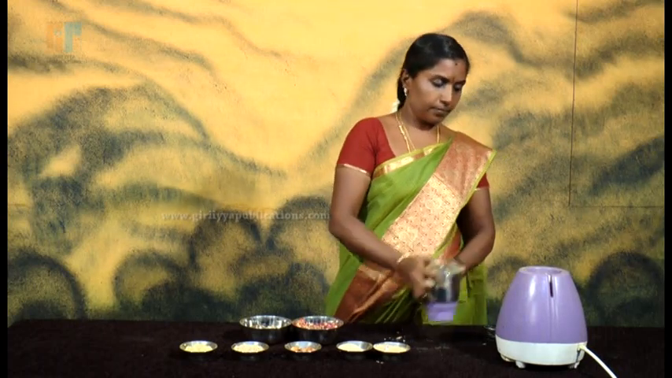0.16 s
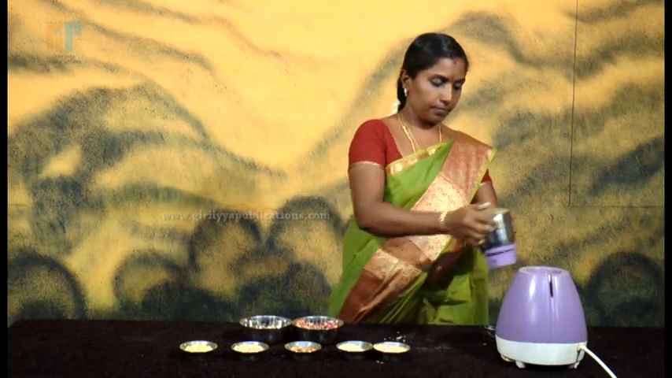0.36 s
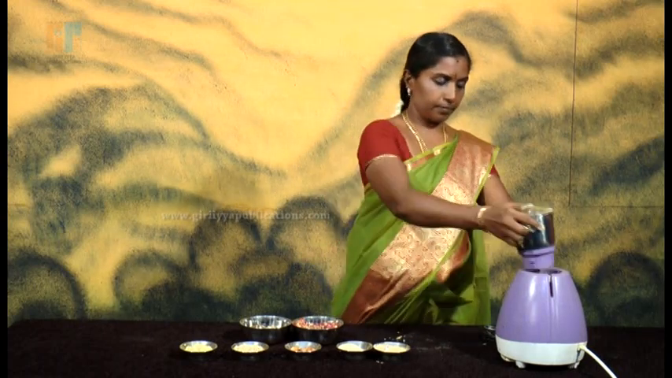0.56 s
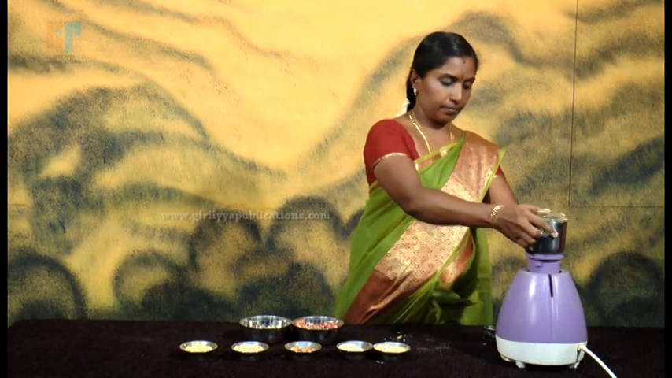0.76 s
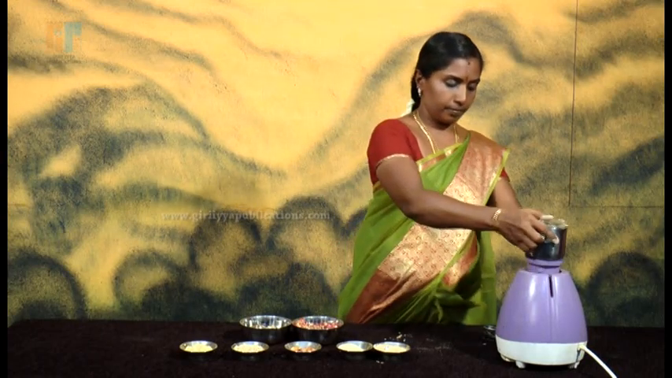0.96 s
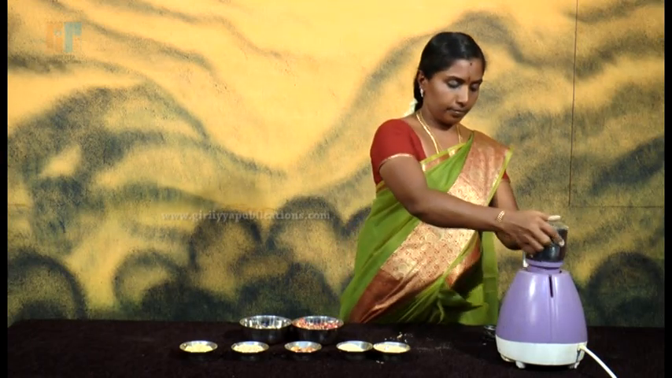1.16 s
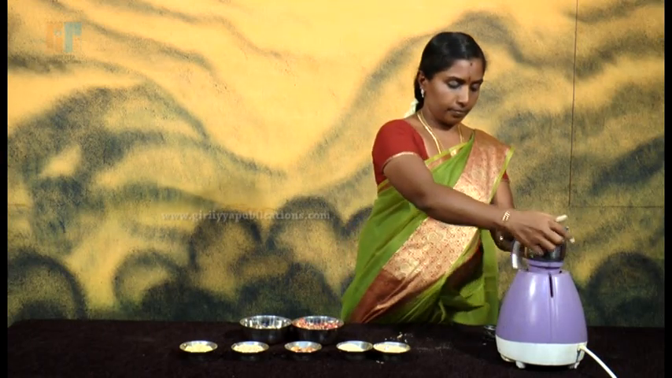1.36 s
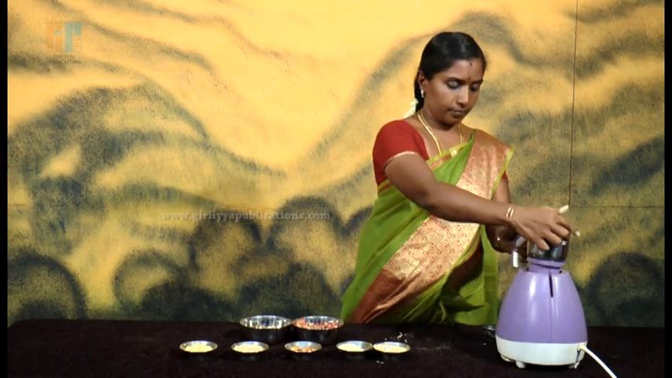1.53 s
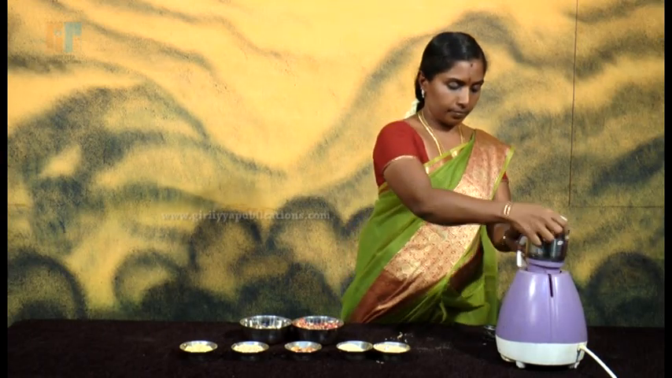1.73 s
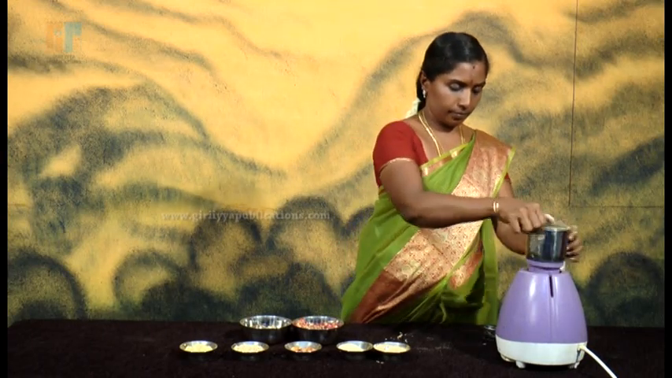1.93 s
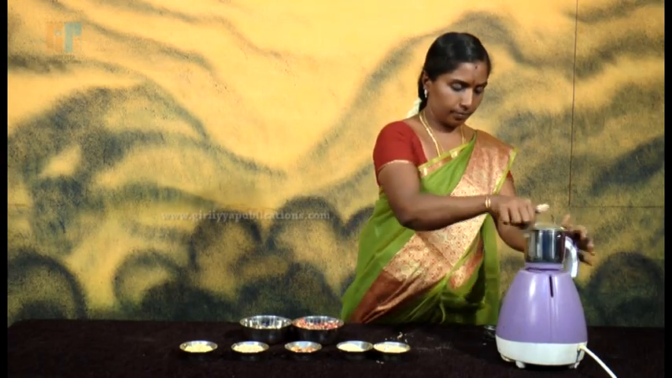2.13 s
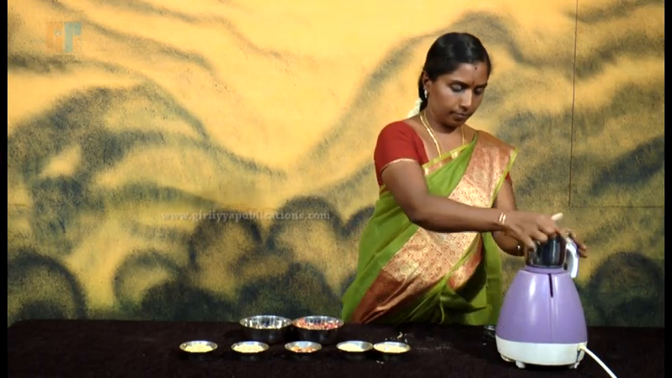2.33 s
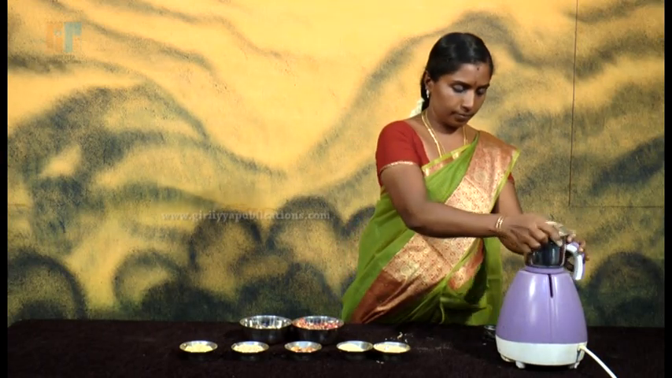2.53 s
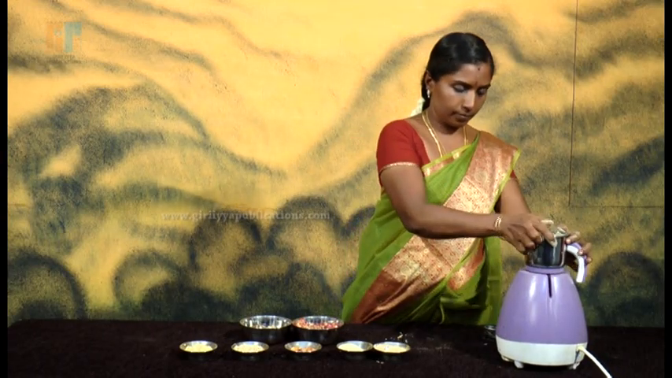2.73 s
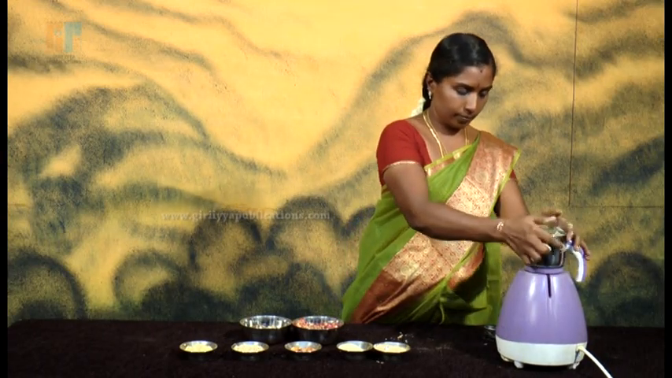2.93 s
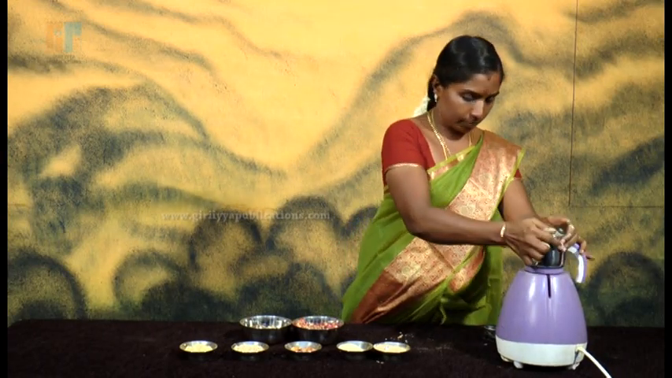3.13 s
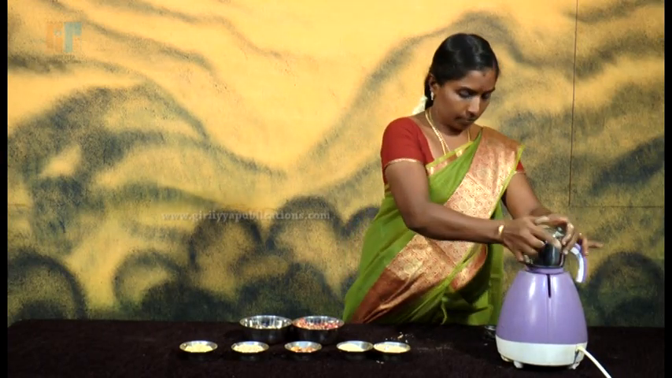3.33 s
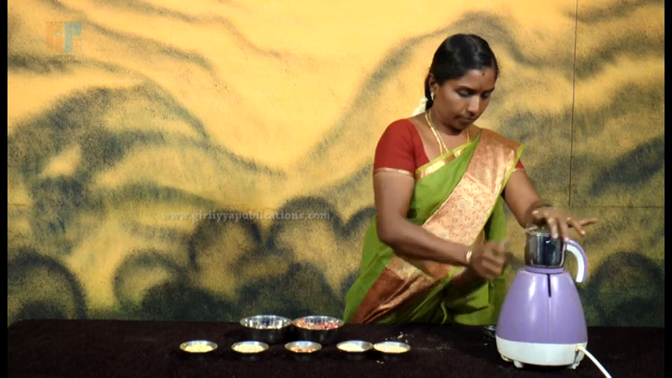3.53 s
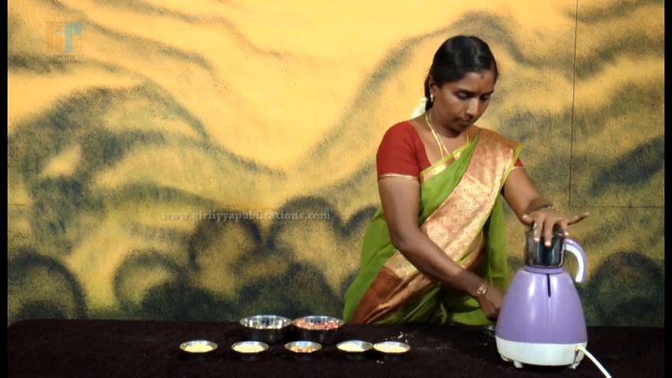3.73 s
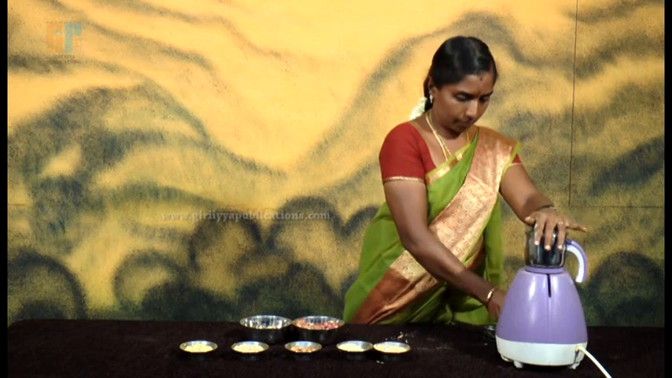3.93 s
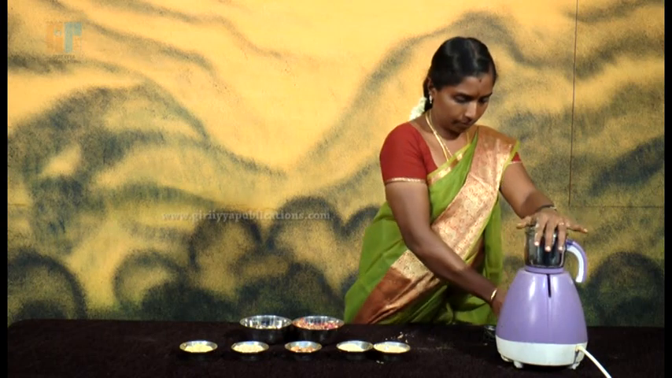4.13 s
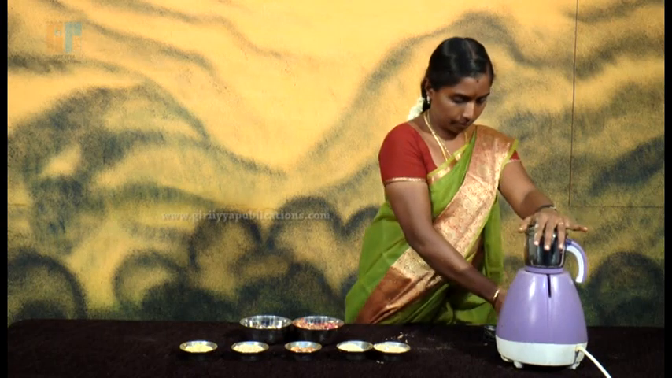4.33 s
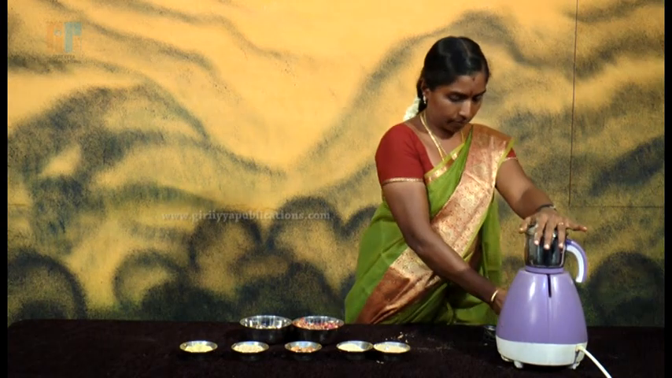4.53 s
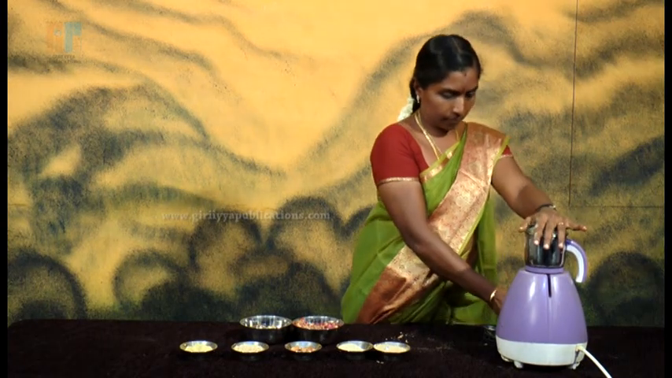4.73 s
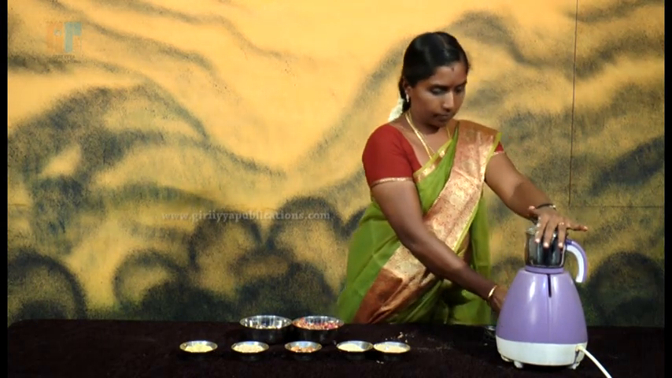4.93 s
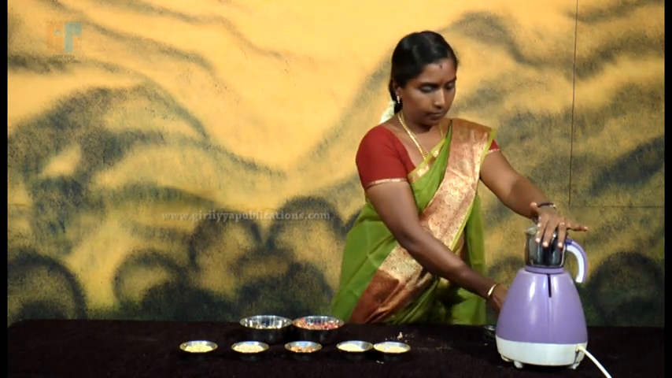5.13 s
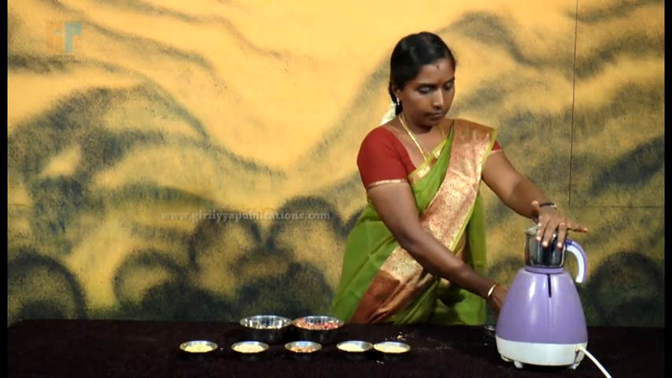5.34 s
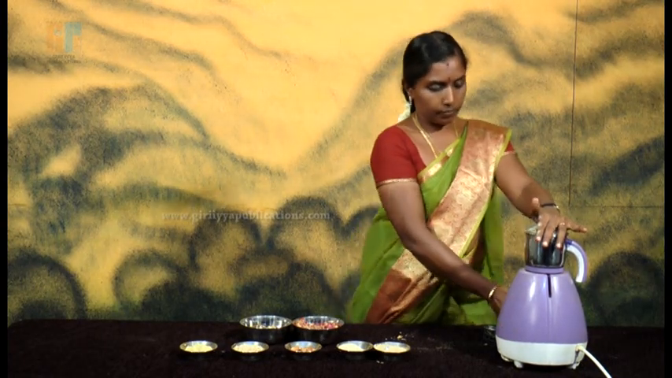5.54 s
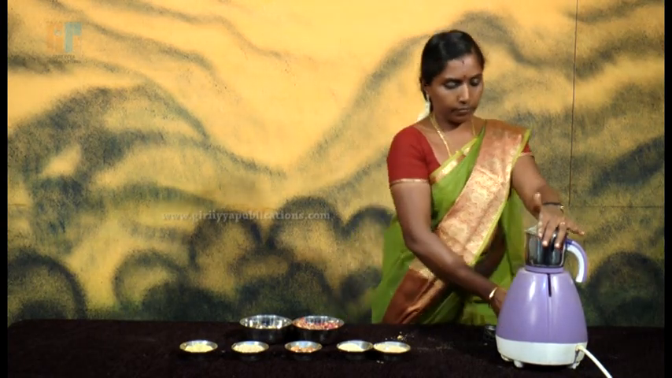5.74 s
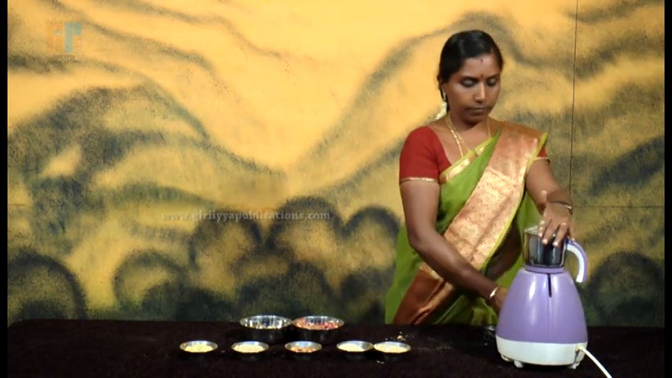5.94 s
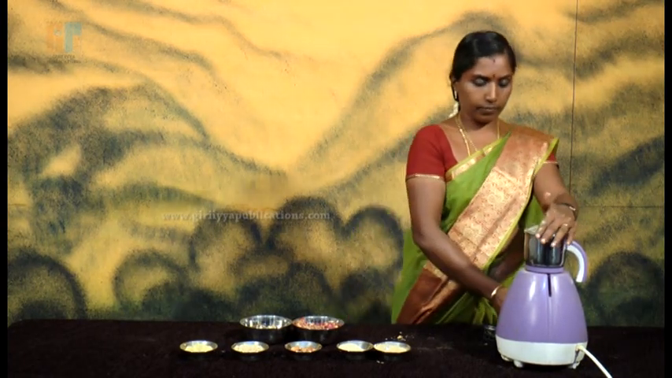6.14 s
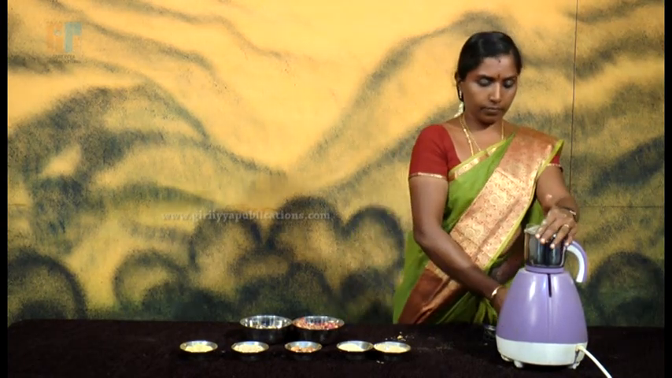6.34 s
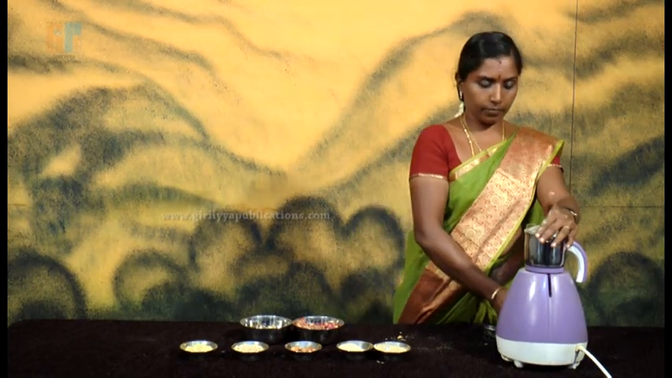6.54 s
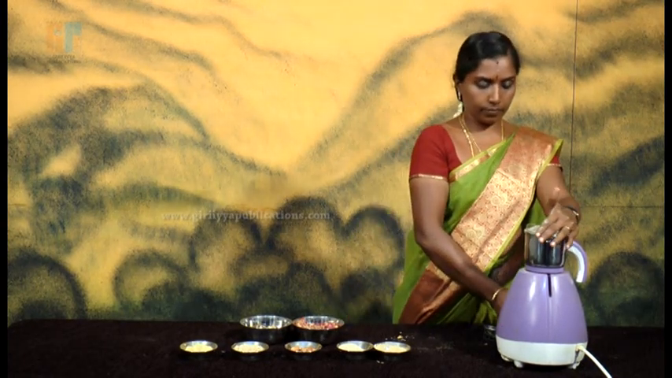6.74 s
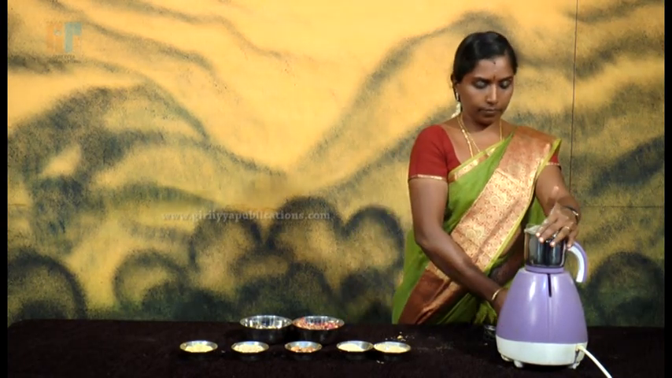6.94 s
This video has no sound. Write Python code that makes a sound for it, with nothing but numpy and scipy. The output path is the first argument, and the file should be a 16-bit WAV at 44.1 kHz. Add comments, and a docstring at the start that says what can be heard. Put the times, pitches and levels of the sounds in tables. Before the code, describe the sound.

At about 0.6 seconds a steel jar is set onto a mixer grinder with a cluster of knocks, loudest up to 1.1 seconds, each making the wooden table boom. Hands rub and twist the jar, with more clacks around 2 seconds and lighter bumps until 3.7. Glass bangles clink faintly, most clearly near 3.8 seconds. After a short lull, a switch snaps on at about 4.4 seconds. The motor hums and whines upward, briefly shaking the table, and reaches full speed around 5.5 seconds. Hard spices roar and crack against the jar wall, most sharply in the first second of grinding. From about 5.2 seconds the roar softens as they turn to powder, though lumps keep rattling. The motor is still running steadily at the end, around 7 seconds. The sound is in stereo, with the short echo of a small room.

```python
"""In a small room, a steel jar is seated and twisted onto a mixer grinder on a wooden table.
Hands rub, each knock makes the table boom, and glass bangles clink. Then a switch clicks: the motor
climbs to full speed, whines, and whirls hard spices against the jar wall. Their roar softens as they
turn to powder. Two microphones hear it all and round off the loudest peaks."""
import sys
import numpy as np
from scipy import signal
from scipy.fft import rfft, irfft, next_fast_len
from scipy.io import wavfile
from scipy.ndimage import uniform_filter1d

SR = 44100
rng = np.random.default_rng(int(sys.argv[2]) if len(sys.argv) > 2 else 0)


def master(y):
    """Save y as 16-bit WAV."""
    cut = np.clip(np.atleast_2d(y).T, -1, 1)
    pcm = np.round(cut * 32767)  # scale
    wavfile.write(sys.argv[1], SR, pcm.astype(np.int16))


N = 312669
FFT_SIZE, TIME = next_fast_len(N), np.arange(N) / SR
SWITCH_S = 4.376  # the motor starts


def undb(db):
    """Turn decibels into a gain to multiply by."""
    return 10 ** (np.asarray(db) / 20)


def unit(x):
    """Scale a sound to an average power of 1."""
    return x / np.sqrt(np.mean(x ** 2))


def curves(table):
    """Join a table's rows with straight lines over time."""
    times, *columns = np.transpose(table)
    return [np.interp(TIME, times, column) for column in columns]


def along(points):
    """Spread (frequency, value) points over the whole spectrum."""
    hz, value = np.transpose(points)
    return np.interp(np.log(np.fft.rfftfreq(FFT_SIZE, 1 / SR) + 1), np.log(hz), value)


def colour(x, points):
    """Shape a sound's bass and treble with (frequency, level) points."""
    return unit(irfft(rfft(x, FFT_SIZE) * undb(along(points)), FFT_SIZE)[..., :N])


def band(lo_hz, hi_hz):
    """Noise between two frequencies."""
    bandpass = signal.butter(2, [lo_hz, hi_hz], "bandpass", fs=SR, output="sos")
    return unit(signal.sosfilt(bandpass, rng.standard_normal(N)))


def wide_noise():
    """Noise that is half shared, half different in left and right."""
    return rng.standard_normal(N) + rng.standard_normal((2, N))


def wobble(rate):
    """A smooth random drift of size about 1, with `rate` new values a second."""
    hold = int(SR / rate)
    steps = np.repeat(rng.standard_normal(N // hold + 1), hold)
    return 1.113 * uniform_filter1d(uniform_filter1d(steps, hold), hold)[:N]


def bursts(times, db, t60, rise_s):
    """A loudness curve that jumps up at each time, then fades 60 dB in t60 seconds."""
    blows = np.zeros(N)
    blows[(times * SR).astype(int)] = undb(db)
    rise, fall = np.exp(-1 / (rise_s * SR)), np.exp(-np.log(1000) / (t60 * SR))
    return signal.lfilter([1 - rise], np.convolve([1, -rise], [1, -fall]), blows)


def ring(x, hz, t60):
    """One natural note of an object, set ringing by x; it fades 60 dB in t60 seconds."""
    fall, angle = np.exp(-np.log(1000) / (t60 * SR)), 2 * np.pi * hz / SR
    return signal.lfilter([0, np.sin(angle)], [1, -2 * fall * np.cos(angle), fall * fall], x)


def strike(times, db, notes, scatter_db, spread_s, favour_hz=None, slope_db=0):
    """Each blow rings each note a bit differently; notes lose slope_db per octave from favour_hz."""
    chance, out = rng.standard_normal((len(times), 5, len(notes))), 0
    for (hz, note_db, t60), (delay, sign, strength, phase, pan) in zip(notes, chance.T):
        blows, at = np.zeros((2, N)), (times + spread_s * np.abs(delay)) * SR
        size_db = db + note_db + scatter_db * strength
        if favour_hz is not None:
            size_db -= slope_db * np.abs(np.log2(hz / favour_hz))
        for mic, side in enumerate((1, -1)):  # left and right differ in timing and strength
            lag = side * .4 * phase * SR / (2 * np.pi * hz)
            gain = undb(size_db + side * 3 * pan)
            np.add.at(blows[mic], (at + lag).astype(int), np.sign(sign) * gain)
        out = out + ring(blows, hz, t60)
    return out


# The tone of the room's echo: f/Hz, level/dB
ECHO_TONE = [(60, -9), (300, -13), (1000, -12), (2500, -8), (6000, -7.5)]
# How much louder the left microphone is than the right: f/Hz, level/dB
LEFT_LOUDER = [(60, -5.5), (110, -11), (200, 8.5), (380, 1), (900, 6.5), (4400, 1), (8100, 8.5), (14000, 0)]
# How far the left one's wave runs ahead: f/Hz, phase/rad
LEFT_AHEAD = [(60, .6), (300, .8), (800, .7), (1100, .1), (4300, 0), (5300, .6), (9000, 6.3), (11500, 6.5),
              (14000, 9.1)]

def room(sound, echo_s=.12):
    """The walls give each microphone its own short echo; the two also differ in tone and timing."""
    size, lead = next_fast_len(N + SR // 2), SR // 50
    tail = rng.standard_normal((2, N)) * undb(-60 * TIME / echo_s) * (TIME > .004)
    tail /= np.sqrt(np.sum(tail ** 2, axis=1, keepdims=True))
    echo = rfft(tail, FFT_SIZE) * undb(along(ECHO_TONE))
    left = undb(along(LEFT_LOUDER) / 2) * np.exp(.5j * along(LEFT_AHEAD))
    response = irfft((1 + echo) * np.array([left, 1 / left]), FFT_SIZE)
    response = np.roll(response, lead, axis=1)[:, :SR // 2]
    return irfft(rfft(sound, size) * rfft(response, size), size)[:, lead:lead + N]


# A brief low thump at the start, then hands sliding and twisting the jar:
# start/s, end/s, rumble/dB, rustle/dB, hiss/dB
RUBS = [(0, 0.031, -34, -72, -54.5), (0.025, 0.57, -56, -65.5, -58.5), (0.676, 0.808, -26, -51, -65),
        (0.818, 0.84, -39, -48, -59.5), (0.95, 1.01, -27.5, -42, -58), (1.025, 1.33, -35, -55.5, -64),
        (1.794, 1.993, -32, -53, -64.5), (2.039, 2.26, -25, -45.5, -69.5),
        (2.436, 2.686, -39.5, -56.5, -64.5), (3.196, 3.293, -72, -66, -64), (3.704, 3.811, -44.5, -72, -74)]

def rub_strengths(rest_db=(-50, -73, -73.5), quiet_db=(-73.5, -81, -88.5), drop_s=3.88):
    """Gains of rumble, rustle and hiss: rubs swell and fade; at drop_s all three turn abruptly quieter."""
    t = np.arange(0, N / SR, .002)
    start, end, *db = np.transpose(RUBS)[..., None]
    fade_db = np.maximum(np.maximum(249 * (start - t), 216.5 * (t - end)), 0)
    power = np.sum(undb(np.array(db) - fade_db) ** 2, axis=1) + undb(rest_db)[:, None] ** 2
    gains = np.where(t < drop_s, np.sqrt(power), undb(quiet_db)[:, None])
    return curves(np.vstack([t, gains]).T)


# Natural notes of the wooden table and of the grinder's body: f/Hz, level/dB, fade time/s
TABLE_NOTES = [(59.4, 4, 0.26), (79.55, 2.5, 0.17), (111.4, 6, 0.13), (160.1, 5.5, 0.17)]
BODY_NOTES = [(236.7, 2, 0.2), (268.9, -1, 0.26), (311.9, -1.5, 0.17), (368, -1.5, 0.13), (434, -6, 0.11),
              (495.3, -11.5, 0.13), (600, -10, 0.05)]
# The tone of rubbing and scraping: f/Hz, level/dB
RUSTLE_TONE = [(300, -16), (450, 4), (865, 3.5), (1500, -4.5), (2100, 1.5), (3300, -11.5), (4300, -20),
               (6000, -34)]

def hands():
    """Rubbing shakes the table and the grinder's body, and rustles unevenly over a fine hiss."""
    rumble_gain, rustle_gain, hiss_gain = rub_strengths()
    friction = rng.standard_normal(N)
    rumble = sum(undb(db) * ring(friction, hz, t60) for hz, db, t60 in TABLE_NOTES)
    rumble += sum(undb(db - 6) * ring(friction, hz, t60) for hz, db, t60 in BODY_NOTES)
    rustle = colour(rng.standard_normal(N), RUSTLE_TONE) * undb(wobble(30) + 3.5 * wobble(250))
    hiss = colour(wide_noise(), [(2500, -2.5), (4500, -3), (15000, -12.5)])
    rumble = unit(rumble) * undb(4.5 * wobble(8.5))
    return rumble * rumble_gain + rustle * rustle_gain + hiss * hiss_gain


# Bangles touching: t/s, level/dB, favoured f/Hz
CLINKS = [(0.553, -48, 11100), (2.9891, -56, 10000), (3.326, -49, 12500), (3.347, -52, 8840),
          (3.393, -53.5, 10900), (3.753, -34.5, 8200), (3.766, -44, 10900)]
# Natural notes of the glass: f/Hz, level/dB, fade time/s
GLASS_NOTES = [(4753, -8, .05), (7420, -9, .05), (7900, -13, .04), (10760, -12, .05), (11050, -5, .07),
               (11570, -11, .05), (15060, -6, .05), (15280, -3, .05)]
# Small bright ticks: t/s, level/dB
TICKS = [(2.308, -54), (3.07, -52.5)]

def bangles():
    """Glass bangles touch and ring high and briefly; two dry ticks sound besides."""
    times, db, hz = np.transpose(CLINKS)
    ticks = bursts(*np.transpose(TICKS), t60=.014, rise_s=.0018) * band(3000, 9500)
    return strike(times, db, GLASS_NOTES, 2, .0044, favour_hz=hz, slope_db=12) + ticks


# Knocks of jar and hands; body and clack levels are added to the thud's:
# t/s, thud level/dB, thud f/Hz, body level/dB, body f/Hz, clack level/dB
KNOCKS = [(0.608, -19, 173, 9.5, 269, 3), (0.618, -4, 101.4, -3, 272, -18), (0.656, -19.5, 99, 7, 285, -30),
          (0.742, -21.5, 72.7, -2, 272, -22), (0.818, -35.5, 81.5, 0, 240, 1),
          (0.894, -4, 95, -9.5, 279, -11.5), (0.919, -5, 64.2, -28, 234, -36),
          (0.994, -18, 125, 3.5, 270, -7.5), (1.011, -7, 107, -1, 310, -11.5),
          (1.038, -8, 89, -8.5, 274, -45.5), (1.104, -16.5, 96, -9, 232, -17),
          (1.291, -24.5, 131, -5, 302, -18.5), (1.323, -25.5, 70.7, -3.5, 278, -23),
          (1.749, -24.5, 171, 1, 300, -14), (1.772, -25.5, 68, -7, 370, -15.5),
          (2.018, -17, 154, -3, 242, -6.5), (2.027, -14.5, 150, 8, 375, 7.5),
          (2.064, -16, 69.4, -6, 345, -39), (2.135, -24, 67, 0, 335, -5), (2.195, -15, 110, -2, 294, -8),
          (2.26, -24.5, 62, 4, 310, -14), (2.392, -37, 68.5, -5.5, 240, -14),
          (2.595, -29.5, 159, 2, 485, -4), (2.665, -37, 65, -16, 238, -27),
          (2.833, -40.5, 60.7, -15.5, 235, -21), (2.971, -37.5, 122.7, 0.5, 443, -17.5),
          (3.095, -30, 71, -3.5, 400, -35), (3.456, -31, 148.6, -20.5, 431, -42),
          (3.66, -32.5, 157, 3, 383, -36.5), (3.715, -34, 150, 0.5, 472, -40)]
# Natural notes of the steel jar: f/Hz, level/dB, fade time/s
JAR_NOTES = [(680, 2, 0.076), (866.5, 6.5, 0.055), (1272, 1, 0.034), (1970, -6, 0.039), (2158, -8, 0.062),
             (2590, -11.5, 0.032), (3033, -12, 0.045), (3450, -15, 0.04), (3822, -17.5, 0.018)]

def knocks():
    """Each knock rings table, body and jar, with a short crack, a noisy tail and a bright tick."""
    times, thud_db, thud_hz, body_db, body_hz, clack_db = np.transpose(KNOCKS)
    jar_db = thud_db + clack_db
    table = strike(times, thud_db, TABLE_NOTES, 1.1, .004, favour_hz=thud_hz, slope_db=15.5)
    body = strike(times, thud_db + body_db + 1.5, BODY_NOTES, 1.5, .008, favour_hz=body_hz, slope_db=16)
    jar = strike(times, jar_db - 9.5, JAR_NOTES, scatter_db=3.5, spread_s=.0023)
    crack = bursts(times, jar_db + 6.5, t60=.017, rise_s=.001)
    tail = bursts(times, jar_db - 19.5, t60=.23, rise_s=.0038)
    noise = colour(rng.standard_normal(N), RUSTLE_TONE)
    tick = bursts(times, jar_db - 21.5, t60=.03, rise_s=.001) * band(4000, 9300)
    return table + body + jar + (crack + tail) * noise + tick


# Clicks of the switch: t/s, level/dB
SWITCH_CLICKS = [(4.238, -57.5), (4.337, -62), (4.377, -18)]

def switch():
    """The knob clicks twice, then the contacts crack shut."""
    return bursts(*np.transpose(SWITCH_CLICKS), t60=.012, rise_s=.0018) * band(725, 5000)


# The snap at switch-on, then sharp hits that ring the jar, mostly spice lumps striking its wall: # t/s,
# level/dB, treble against that level/dB, favoured f/Hz
BIG_HITS = [(4.377, -10, -10.5, 2100), (4.456, -11, -35, 2130), (4.485, -11.5, -21, 3000),
            (4.5044, -18, 5, 2950), (4.573, -8, -8, 2950), (4.6712, -8.5, -7, 2960),
            (4.7412, -7, -2.5, 3460), (4.9582, -8.5, -12, 2882), (5.0498, -6, -13, 2970),
            (5.198, -7, -22, 3405), (5.2176, -6.5, -11.5, 3580), (5.745, -14.5, -18, 3100),
            (5.7829, -15.5, -14, 2890), (5.8866, -11.5, -15, 3450), (5.9, -13, -18, 2120),
            (6.0483, -11, -15, 2565), (6.0866, -11.5, -18, 3134), (6.2903, -13, -25, 3490),
            (6.383, -12.5, -32, 3500), (6.415, -12.5, -31, 3472), (6.427, -18, -25, 2600),
            (6.5246, -11.5, -35, 3802), (6.589, -13, -32, 3417), (6.6318, -12.5, -21, 3530),
            (6.647, -10, -8.5, 2906), (6.672, -14.5, -19, 3123), (6.6889, -14.5, -17, 3400)]

def rattles(small_count=320):
    """After the switch's snap, thrown lumps crack against the jar and ring it, small ones at random."""
    when, size, pitch = rng.random((small_count, 3)).T
    small = [SWITCH_S + (N / SR - SWITCH_S - .05) * when, -31 - 1.2 * np.log(1 - size),
             np.full(small_count, -19.), 2950 + 900 * pitch]
    times, db, treble_db, hz = np.hstack([np.transpose(BIG_HITS), small])
    rough = undb(2.5 * wobble(400))

    def swell(level_db, rise_s):  # each hit is a cluster of blows, so it has no sharp start
        return uniform_filter1d(bursts(times, level_db, .014, rise_s), size=SR // 200)

    crack = swell(db - 9.5, .0074) * (band(3060, 3910) + 1.7 * band(950, 2880))
    crack += swell(db + treble_db, .0043) * band(7200, 12300)
    wall_notes = [(note_hz, 0, .65 * t60) for note_hz, _, t60 in JAR_NOTES[3:]]
    wall = strike(times, db - 10, wall_notes, 2, .004, favour_hz=hz, slope_db=30)
    hollow = strike(times, db - 31, JAR_NOTES[1:3], 3.4, .00406)
    return rough * crack + wall + hollow


# The tone of the whirling grains and of the rushing air: f/Hz, level/dB
ROAR_TONE = [(40, -67), (90, 3.5), (300, 3), (600, -0.5), (1300, -3.5), (1700, -7.5), (2600, -5),
             (3500, -1.5), (4500, -13), (7000, -62)]
AIR_TONE = [(3000, 2), (15000, 3.5)]
# A low hum and the jar's ringing: f/Hz, width/Hz, level against the roar/dB
RINGING = [(102.5, 23, -17.5), (1412, 81, -11.5), (2130, 180, -14.5), (3085, 120, -16.5), (3543, 29, -17.5),
           (9700, 630, -19.5)]

def spice_roar(turn, powder, coarse_db=-26.5, powder_db=-36.5):
    """Grains thrown once a turn roar in the jar; roar and air hiss take a moment to build."""
    throw = (1 + .25 * np.sin(turn)) * undb(2 * wobble(180) + wobble(35))
    grains = throw * rng.standard_normal(N)
    rings = sum(undb(db) * unit(ring(grains, hz, np.log(1000) / (np.pi * width)))
                for hz, width, db in RINGING)
    roar = colour(grains, ROAR_TONE) + rings * undb(3.6 * wobble(60))
    age_s = np.abs(TIME - SWITCH_S)
    air = colour(throw * wide_noise(), AIR_TONE) * undb(-6 - 11 * np.exp(-age_s / .07))
    level_db = coarse_db + (powder_db - coarse_db) * powder - 7 * np.exp(-age_s / .066)
    return undb(level_db) * (roar + air)


def table_shake(hz, powder, peak_hz=116.8, width_hz=15):
    """A low rumble that swells as the motor's speed passes a natural note of the table."""
    swell_db = 20 * np.exp(-((hz - peak_hz) / width_hz) ** 2)
    return undb(-40 - 9.5 * powder + swell_db) * band(29, 177)


# The shaft's hum through table and body, by turning speed: f/Hz, level/dB
HUM = [(60, -44.5), (88, -25.5), (120, -40), (146, -23), (168, -35), (195, -31.5), (212, -20), (228, -22),
       (243, -26), (256, -36.5)]
# Higher tones of the hum: multiple of the speed, level while climbing/dB, level at full speed/dB
OVERTONES = [(2, -37, -38.5), (3, -43, -47), (4, -43, -40), (5, -44, -40), (6, -45, -52)]
# The whine through the body, and a whistle at three times its pitch: f/Hz, level/dB
WHINE = [(700, -36), (1850, -33), (1940, -20), (2050, -16), (2130, -19), (2200, -34), (3100, -45)]
WHISTLE = [(7500, -62), (8400, -52), (8900, -53), (9100, -61)]

def motor_tones(hz, turn, slots=12, full_speed_hz=(245, 251)):
    """The shaft hums; slots in the spinning core whine, roughened by the brushes that rub on it."""
    hum = undb(np.interp(hz, *np.transpose(HUM)) + wobble(20)) * np.sin(turn)
    for multiple, *db in OVERTONES:  # these come and go with the uneven load
        gain = undb(np.interp(hz, full_speed_hz, db) + 2.3 * wobble(15))
        hum += gain * np.sin(multiple * turn + .1 * multiple * wobble(30))
    whine_db = np.interp(slots * hz, *np.transpose(WHINE)) + 3 * wobble(120)
    whine = undb(whine_db) * np.sin(slots * turn + .9 * wobble(220))
    whistle_db = np.interp(3 * slots * hz, *np.transpose(WHISTLE))
    whistle = undb(whistle_db) * np.sin(3 * slots * turn + 1.6 * wobble(130))
    return hum + whine + whistle


# How many times a second the shaft turns: t/s, f/Hz
SHAFT_SPEED = [(4.376, 60.2), (4.5, 110.5), (4.575, 142.1), (4.675, 149.8), (4.7, 163), (4.78, 178.9),
               (4.85, 196.5), (4.92, 212.1), (5.15, 230.9), (5.3, 238.5), (5.5, 246.2), (6.1, 249.9),
               (6.6, 254.4), (7.09, 252.7)]

def grinder(half_ground_s=5.23, crumble_s=.24):
    """Switched on, the motor speeds up, whirls the spices to powder and shakes the table."""
    hz, = curves(SHAFT_SPEED)
    turn = 2 * np.pi * np.cumsum(hz * (1 + .00205 * wobble(15))) / SR  # the shaft's angle
    powder = .5 + .5 * np.tanh((TIME - half_ground_s) / crumble_s)  # 0 is coarse, 1 is fine
    on = np.clip((TIME - SWITCH_S) / .0039, 0, 1)
    whirl = motor_tones(hz, turn) + spice_roar(turn, powder)
    return switch() + on * (whirl + table_shake(hz, powder))


def scene():
    """All the sources sound together in the room."""
    return room(knocks() + hands() + bangles() + grinder() + rattles())


def record(dry, bass_hz=53, limit=.84, top_hz=16000):
    """The microphones lose the deepest bass, round off loud peaks and cut the highest treble."""
    thin = signal.sosfilt(signal.butter(4, bass_hz, "highpass", fs=SR, output="sos"), dry)
    rounded = thin / (1 + np.abs(thin / limit) ** 6) ** (1 / 6)
    return signal.sosfilt(signal.ellip(10, .2, 70, top_hz, fs=SR, output="sos"), rounded)


dry = scene()
out = record(dry)
master(out)
```